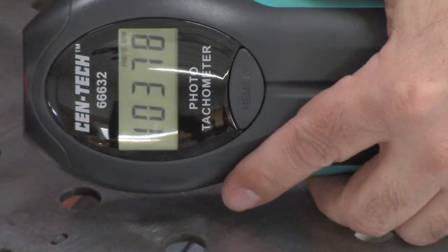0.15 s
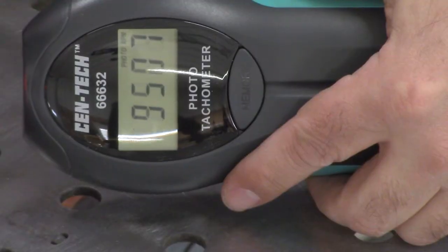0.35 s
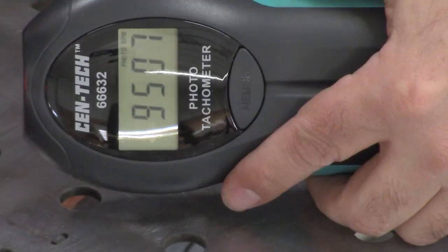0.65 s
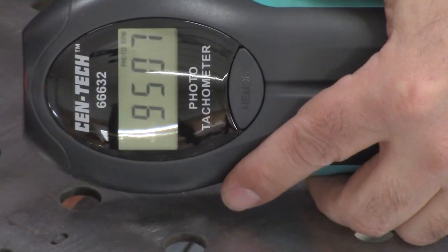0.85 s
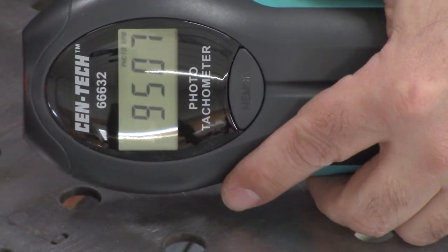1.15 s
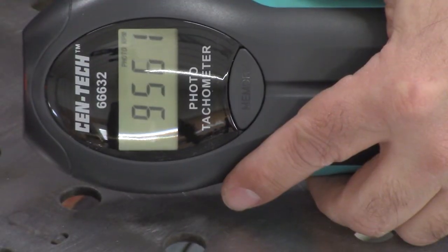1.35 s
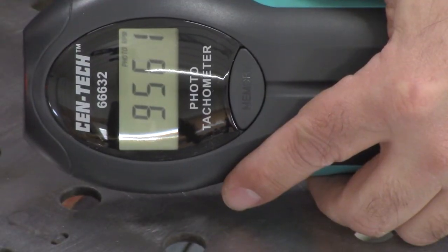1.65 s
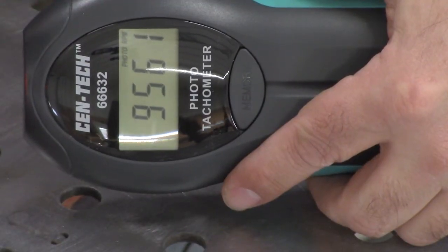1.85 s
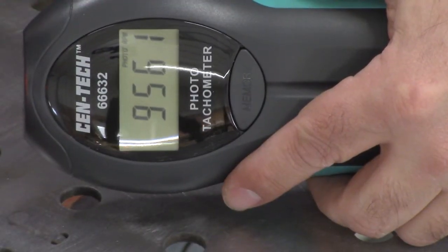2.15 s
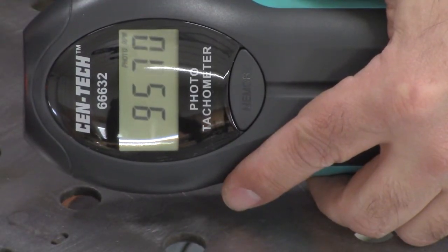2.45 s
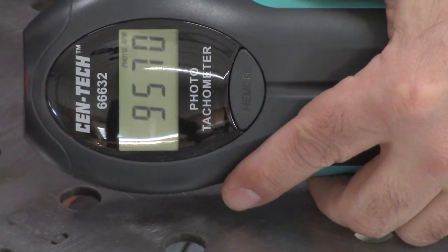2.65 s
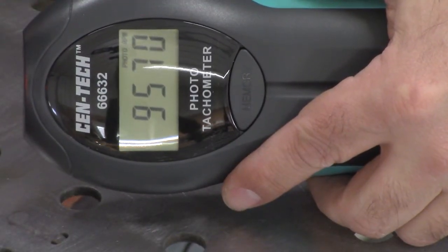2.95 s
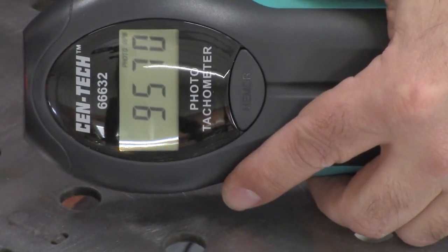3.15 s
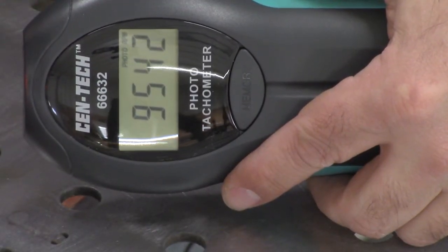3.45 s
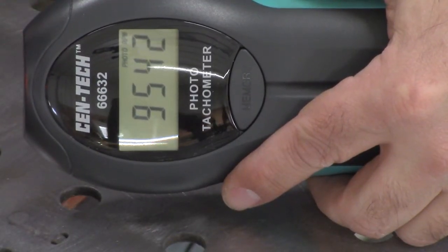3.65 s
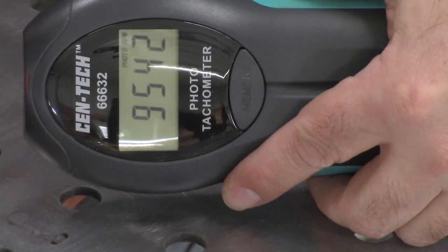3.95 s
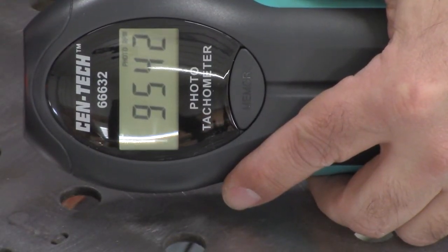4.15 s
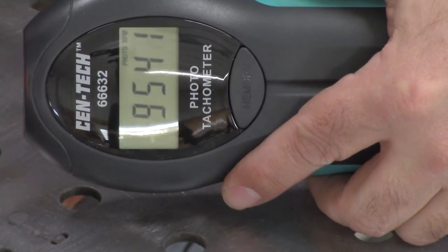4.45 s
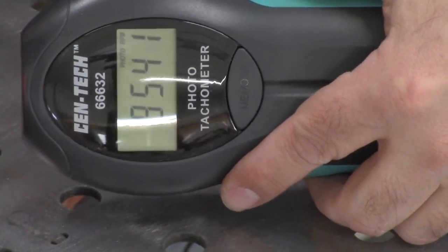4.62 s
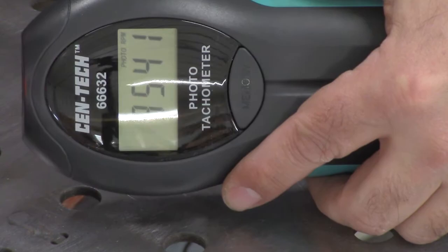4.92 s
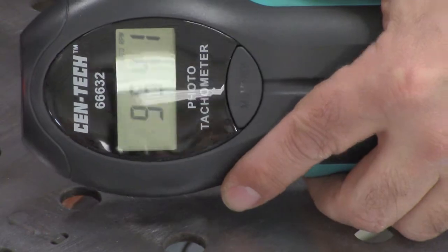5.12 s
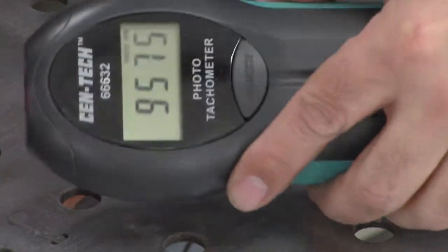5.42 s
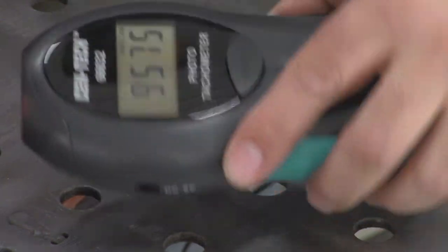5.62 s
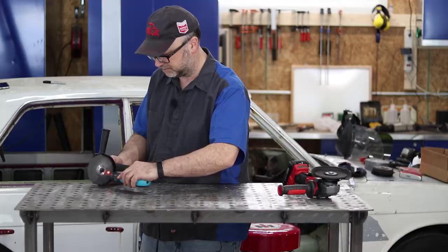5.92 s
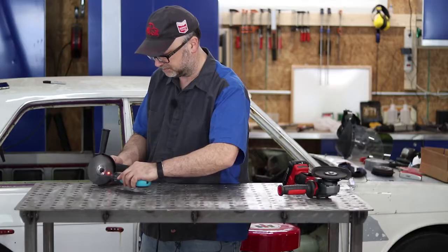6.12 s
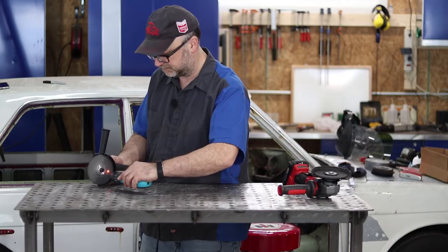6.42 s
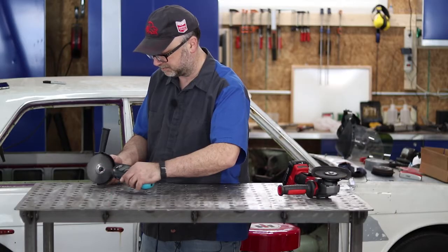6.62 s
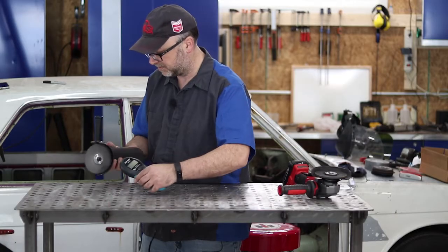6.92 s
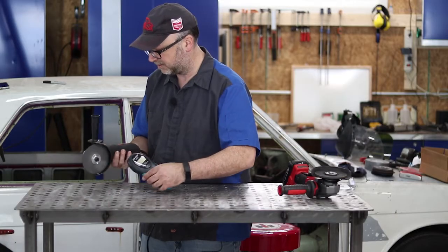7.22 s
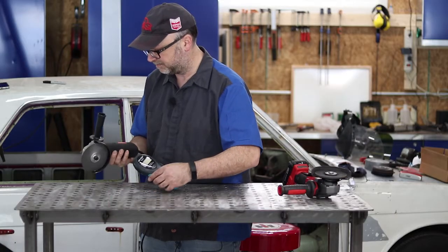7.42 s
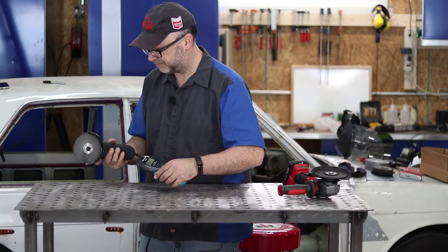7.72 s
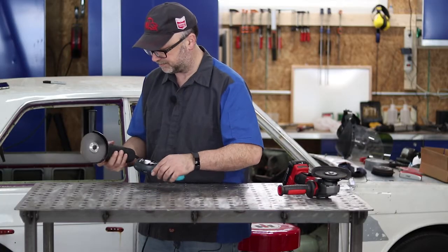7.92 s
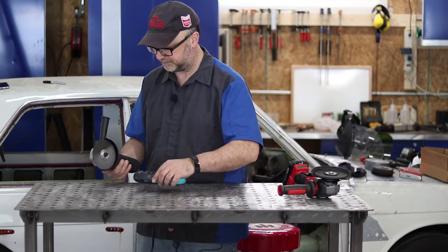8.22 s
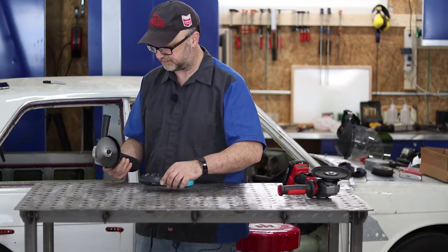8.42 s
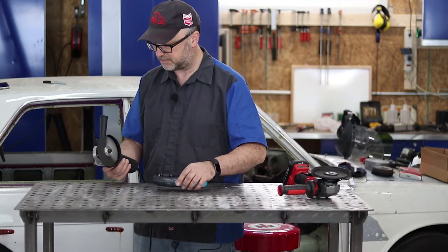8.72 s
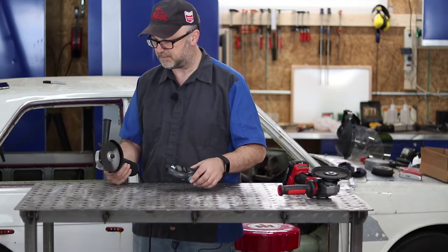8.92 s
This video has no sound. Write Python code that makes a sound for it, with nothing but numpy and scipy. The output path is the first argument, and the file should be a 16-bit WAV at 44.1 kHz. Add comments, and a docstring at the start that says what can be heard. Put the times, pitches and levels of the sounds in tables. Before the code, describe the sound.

Close, loud whirring of an unloaded angle grinder over a steel bench, switched off near the end and coasting down in a sliding whine and rattle.

```python
"""In a garage, a corded angle grinder runs free over a steel bench, is tilted and lifted, then coasts down.
Rotor unbalance hums, the fan's flow makes broadband noise, and the unloaded bevel gears rattle in their
backlash, exciting the resonances of gear head and guard. After switch-off the rattle slows, single clacks
stand out and a high whine slides down. One close microphone feeds the left channel; the right is silent."""
import sys
import numpy as np
from scipy import signal
from scipy.fft import rfft, irfft, next_fast_len
from scipy.io import wavfile
from scipy.ndimage import map_coordinates

SR = 44100
rng = np.random.default_rng(int(sys.argv[2]) if len(sys.argv) > 2 else 0)


def int16_out(signal):
    """Quantize to a 16-bit WAV file."""
    q = np.round(np.clip(np.atleast_2d(signal).T, -1, 1) * 32767)
    wavfile.write(sys.argv[1], SR, q.astype(np.int16))


N = 399987
T = np.arange(N) / SR  # time [s]

# All levels are relative: the gains of the mix follow.
# Rotor speed under power, drifting a little: (time [s], speed [turns/s])
SPEED = [(0.1, 491.2), (1.61, 492.2), (1.85, 491.2), (4.4, 491.2), (4.46, 493.3), (7.35, 494.4)]
# Tones while current flows; order 12 = armature slots, 13 = gear mesh: (multiple of rotor speed [1], level [dB])
DRIVEN = [(8.49, -60), (12, -60), (13, -60), (15.55, -66), (21.38, -66), (24.6, -66)]
# Shaking by the spindle: (multiple of spindle speed [1], level [dB])
SPINDLE = [(1, -63.5), (2, -66.5), (4, -58), (5, -62), (6, -60.5), (7, -62.5)]
# Rotor orders that make the disc sing as they pass its mode: (multiple of rotor speed [1], level [dB])
ROTOR = [(2, -56), (3, -54), (4, -57)]
# Radiation of the shaking by the tool's body: (frequency [Hz], level [dB])
BODY = [(90, -21), (160, -7), (200, -28), (270, -5.5), (360, 4), (460, -14), (640, -4), (800, -6),
        (1100, -1)]
# Response of the hand-held tool to unbalance and rocking: (frequency [Hz], level [dB])
SWAY = [(150, -18), (215, -12), (240, 0.5), (256, -6.5), (277, 1.5), (302, -17), (335, 1.5), (390, 2),
        (445, 5.5), (490, 0)]
# Resonances that the whine slides through: (frequency [Hz], half width [Hz], level [dB])
WHINE_PEAKS = [(8680, 270, 9), (10220, 240, 18), (12300, 440, 10), (14600, 600, 3)]
# Spectrum of the fan's rush: (frequency [Hz], level per hertz [dB])
RUSH = [(600, -30.5), (900, -15), (1100, -8), (1500, 2), (2100, 2), (2550, -2), (3200, 0.5), (4000, -1),
        (6300, -4.5), (7300, -10.5), (8800, -16), (11000, -7), (12800, -12), (15600, -10.5)]
# Spectrum of the gear rattle: (frequency [Hz], level per hertz [dB])
RATTLE = [(600, -12), (1200, -20), (2500, -4.5), (4000, 3.5), (5000, 2), (6100, 4.5), (7500, -6),
          (9300, -9.5), (12000, -4.5), (15600, -15)]
# Spectrum of the low draught: (frequency [Hz], level per hertz [dB])
DRAUGHT = [(60, -7.5), (150, -6), (300, -2.5), (430, 3), (550, 0), (720, 1), (860, -7.5), (1300, -20.5)]
# Spectral change of rush and rattle as the fan slows: (frequency [Hz], level [dB])
SLOW_FAN = [(1000, 4), (3500, -4), (6000, -6), (9000, -1), (11000, -35), (12200, -11), (15000, -19)]
# Air slots of the housing: (frequency [Hz], width [Hz], level [dB])
VENTS = [(1084, 90, 3.5), (1212, 150, 3.5), (2730, 110, -2), (5600, 360, -7)]
# Modes of gear head and guard: (frequency [Hz], width [Hz], level [dB])
GUARD = [(1956, 300, 13), (2160, 190, 3.5), (3550, 610, -1), (5200, 310, -19), (8300, 120, -10)]
# Rotor speed around which the guard is shaken hardest: (speed [turns/s], half width [turns/s], level [dB])
GUARD_SWELL = [(383, 100, 3)]
# Mode of the cutting disc: (frequency [Hz], width [Hz], level [dB])
DISC = [(990, 28, 0)]
# Strongest gear clacks while coasting: (time [s], peak level [dB])
CLACKS = [(8.0511, -31), (8.1104, -27.5), (8.16, -30), (8.212, -29.5), (8.259, -29), (8.313, -31),
          (8.3539, -37), (8.3958, -32), (8.4662, -33), (8.521, -31.5), (8.5766, -32), (8.63, -30),
          (8.6852, -33), (8.744, -34.5), (8.7877, -29.5), (8.8857, -33.5), (8.9316, -34.5), (8.99, -33)]
# Spectrum of a clack: (frequency [Hz], level per hertz [dB])
CLACK = [(600, -10), (1500, -6), (3600, 6), (5300, -3), (7500, -3.5), (12000, -24), (15600, -26)]
# Peaks and hollows that the shell gives to noise from inside: (frequency [Hz], half width [Hz], level [dB])
HOUSING = [(3910, 450, -3), (7200, 220, 2.5), (9000, 250, 1.5), (9400, 280, 2.5), (9560, 150, -3.5),
           (11130, 200, 0), (12050, 140, 3.5), (12850, 160, 2.5), (14500, 280, -6), (15300, 500, -8)]
# The tool lies flat, is tipped, tilted, turned further, then lifted; each move leads to a new pose:
# (move start [s], move length [s], rush [dB], draught [dB], vents [dB], guard [dB], disc [dB],
#  rattle over the rush [dB], bench echo delay [ms], echo strength [0-1])
POSES = [(0, .1, -39, -52.5, -44, -67, -65, -1.5, .92, 0),
         (4.06, 0.15, -38, -52, -43.5, -48.5, -65, -8, 0.75, 0.37),
         (4.2, 0.14, -37.5, -52.5, -49, -52, -65, -6, .68, 0.2),
         (4.45, 0.99, -37, -51.5, -63, -48.5, -66, -3.5, 0.69, 0.4),
         (6.627, 0.34, -38.5, -53, -69, -37, -54.5, -3, 0.7, 0.45)]
# Reflection from the bench: (frequency [Hz], level [dB])
BENCH = [(500, -11), (1100, -4), (5800, -1.5), (7300, 1.0), (10200, 2.0), (15000, -26)]
# Reverberation of the garage: (frequency [Hz], time to decay by 60 dB [s])
GARAGE = [(200, 0.22), (2000, 0.45), (12000, 0.12)]
# Spectrum of the room's low rumble: (frequency [Hz], level per hertz [dB])
FLOOR = [(12, -30), (20, 3), (43, -9), (118, -20), (184, -16), (300, -30), (390, -47), (660, -120)]

OFF_S = 7.475  # switch-off
TOP_HZ = 15780  # band limit
GEAR_RATIO = 13 / 40  # spindle turns per rotor turn
# friction takes this many turns/s each second; air drag equals it at DRAG_SPEED [turns/s]
FRICTION, DRAG_SPEED = 141.8, 400
# loss each time the speed halves [dB]
RUSH_FALL_DB, DRAUGHT_FALL_DB, RING_FALL_DB, RATTLE_FALL_DB, TONE_FALL_DB = 10.5, 8.5, 12, 2, 13.5
# further loss of rush and rattle above this edge, each time the speed halves
TREBLE_HZ, TREBLE_FALL_DB = 6000, 1
# the gears go quiet for a moment when the drive lets go: depths, and time constant of recovery
LULL_RATTLE_DB, LULL_RING_DB, LULL_S = 17, 6, 0.19
# unbalance at full speed; rocking twice a spindle turn, over the disc's level; coasting whine
HUM_DB, ROCKING_DB, WHINE_DB = -41.5, 2.5, -57
WHINE_ORDER, LOW_WHINE_ORDER = 36.8, 24.5  # multiples of rotor speed
# the gear falls back on the other flank after each clack
REBOUND_S, REBOUND_SCATTER_S, REBOUND_LOSS_DB = 0.032, 0.0028, 3.5


def amp(db):
    """The decibel scale: level to amplitude ratio."""
    return 10 ** (np.asarray(db) / 20)


def unit(x):
    """Normalization to unit rms."""
    return x / np.sqrt(np.mean(x ** 2) + 1e-20)


def along(points, hz):
    """Interpolation of (frequency, value) points on a logarithmic frequency axis."""
    f, v = np.transpose(points)
    return np.interp(np.log(hz + 1), np.log(f + 1), v)


def bumps(peaks, x):
    """Superposed bell-shaped (centre, half width, dB) peaks and hollows, in decibels."""
    return sum(db * np.exp(-((x - centre) / width) ** 2) for centre, width, db in peaks)


def wobble(rate):
    """Slow random modulation: a smooth curve through `rate` random knots a second."""
    return map_coordinates(rng.standard_normal(int(N * rate / SR) + 4), [T * rate])


def noise():
    """White noise: equal mean power at every frequency."""
    return rng.standard_normal(N)


def filtered(x, response):
    """Linear filtering: the spectrum of x times a frequency response."""
    size = next_fast_len(N + SR // 2)
    return irfft(rfft(x, size) * response(np.fft.rfftfreq(size, 1 / SR)), size)[:N]


def coloured(x, spectrum):
    """Spectral shaping that preserves the power of white noise."""
    return filtered(x, lambda hz: unit(amp(along(spectrum, hz))))


def rung(x, modes):
    """Modal resonance: parallel damped modes that preserve the power of white noise."""
    def response(f):
        h = sum(amp(db) * 1j * f * w / (c * c - f * f + 1j * f * w) for c, w, db in modes)
        h = h * f ** 4 / (f ** 4 + modes[0][0] ** 4)  # thin metal radiates little below its first mode
        return h / np.sqrt(np.mean(abs(h) ** 2))
    return filtered(x, response)


def bursts(times, sizes, rise, fade):
    """Impact envelopes: exponential rise and decay with time constants in seconds."""
    starts = np.bincount(np.clip(times * SR, 0, N - 1).astype(int), sizes, N)
    t = np.arange(SR // 25) / SR
    scuff = (1 - np.exp(-t / rise)) * np.exp(-t / fade)
    return signal.fftconvolve(starts, scuff / scuff.max())[:N]


def rotor_speed():
    """Rotational braking: after switch-off, constant friction and square-law air drag slow the rotor."""
    driven = np.interp(T, *np.transpose(SPEED))
    coast_s = np.maximum(T - OFF_S, 0)
    return DRAG_SPEED * np.tan(np.arctan(driven / DRAG_SPEED) - coast_s * FRICTION / DRAG_SPEED)


def halvings(speed):
    """Logarithmic speed scale: how many times the speed has halved since switch-off."""
    return np.log2(speed[int(OFF_S * SR)] / speed) * (T > OFF_S)


def pose():
    """Directional radiation: what the microphone gets from each part, gliding from pose to pose."""
    rows = np.array(POSES)
    values = rows[0, 2:, None]
    for before, after in zip(rows, rows[1:]):
        moved = np.clip((T - after[0]) / after[1], 0, 1)
        values = values + (after - before)[2:, None] * moved
    names = ["rush", "draught", "vents", "guard", "disc", "rattle", "delay", "echo"]
    return dict(zip(names, values))


def tone(turns, blur, rate):
    """Periodic excitation: a sine of unit rms locked to rotation, with phase jitter."""
    return np.sqrt(2) * np.sin(2 * np.pi * (turns + rng.random()) + blur * wobble(rate))


def unbalance(speed, rotor, held):
    """Rotating unbalance and disc rocking: forced vibration follows the held tool's response."""
    hum_db = HUM_DB + along(SWAY, speed) + 0.16 * wobble(12)
    hum = amp(hum_db) * tone(rotor, blur=0.03, rate=30)
    rocking_db = held["disc"] + ROCKING_DB + along(SWAY, 2 * GEAR_RATIO * speed)
    rocking = amp(rocking_db) * tone(2 * GEAR_RATIO * rotor, blur=0.16, rate=17)
    return hum + rocking


def coasting_whine(speed, rotor):
    """Order tracking: two lines locked to the rotor, their level set by the upper line's resonances."""
    high = tone(WHINE_ORDER * rotor, blur=0.8, rate=110)
    low = amp(-6) * tone(LOW_WHINE_ORDER * rotor, blur=1.2, rate=110)
    level_db = WHINE_DB + bumps(WHINE_PEAKS, WHINE_ORDER * speed) + 1.6 * wobble(30)
    return amp(level_db) * (high + low)


def shaft_shaking(speed, rotor):
    """Forced vibration: each spindle order swells as it slides through a body resonance."""
    shake = 0
    for order, db in SPINDLE:
        turns = order * GEAR_RATIO
        level_db = db + along(BODY, turns * speed) + 2.3 * wobble(8)
        shake = shake + amp(level_db) * tone(turns * rotor, blur=0.58, rate=15)
    return shake * speed / speed.max()


def singing_disc(speed, rotor):
    """Resonance: a rotor order sounds strongest as its frequency meets the disc's mode."""
    disc_hz, width_hz, _ = DISC[0]
    return sum(amp(db) / (1 + ((k * speed - disc_hz) / width_hz) ** 2) * tone(k * rotor, blur=0.43, rate=18)
               for k, db in ROTOR)


def driven_tones(rotor):
    """Slot and mesh excitation: orders of the loaded rotor, blurred more at high order."""
    return sum(amp(db + 2 * wobble(7.3)) * tone(k * rotor, blur=0.0038 * k * k, rate=30) for k, db in DRIVEN)


def tones(speed, rotor, power, held):
    """Superposition of the rotational tones; forces weaken with speed, some tones need the drive."""
    force = amp(-TONE_FALL_DB * halvings(speed))
    forced = force * (unbalance(speed, rotor, held) + (1 - power) * coasting_whine(speed, rotor))
    return forced + shaft_shaking(speed, rotor) + singing_disc(speed, rotor) + power * driven_tones(rotor)


def backlash(spindle, scatter, size_db):
    """Backlash impacts: the free gear bounces every few spindle turns, giving sharp snaps and dull knocks."""
    draws = rng.standard_normal((900, 4))
    gaps = np.clip(np.round(2.4 + 0.55 * draws[:, 0]), 1, None)
    turns = np.cumsum(gaps) + scatter * draws[:, 1]
    heard = turns < spindle[-1]
    times = np.interp(turns[heard], spindle, T)
    snap = bursts(times, amp(size_db * draws[heard, 2]), rise=0.00099, fade=0.0021)
    knock = bursts(times, amp(size_db * draws[heard, 3]), rise=0.0004, fade=0.0041)
    return unit(snap), unit(knock)


def slowing_colour(rush, speed):
    """Speed-dependent spectrum: the noise changes colour and loses treble as the fan slows."""
    slowed = np.clip(6.1 * (1 - speed / speed.max()), 0, 1)
    slow = amp(-1) * filtered(rush, lambda hz: amp(along(SLOW_FAN, hz)))
    rush = (1 - slowed) * rush + slowed * slow
    treble = filtered(rush, lambda hz: hz ** 4 / (hz ** 4 + TREBLE_HZ ** 4))
    return rush + (amp(-TREBLE_FALL_DB * halvings(speed)) - 1) * treble


def fan_and_gears(speed, rotor, power, held):
    """Flow noise and impact excitation: air and rattle sound with vents, guard and disc, fading with speed."""
    slower = halvings(speed)
    lull = (1 - power) * np.exp(-np.maximum(T - OFF_S, 0) / LULL_S)
    rush_db = held["rush"] - RUSH_FALL_DB * slower
    rattle_db = held["rattle"] - RATTLE_FALL_DB * slower - LULL_RATTLE_DB * lull
    ring_db = -RING_FALL_DB * slower - LULL_RING_DB * lull
    # the brushes hiss harder at each peak of the current, 120 times a second
    air = 1 + 0.06 * power * np.cos(2 * np.pi * 120 * T) + 0.1 * wobble(200)
    snap, knock = amp(rattle_db) * np.array(backlash(GEAR_RATIO * rotor, scatter=0.14, size_db=1.34))
    balance = 1 / np.sqrt(1 + amp(rattle_db) ** 2)  # offsets the power that the rattle adds

    fan = amp(rush_db + 3.5) * coloured(air * noise(), RUSH)
    rattle = amp(rush_db + 1.0) * coloured(snap * noise(), RATTLE)
    rush = slowing_colour(fan + rattle, speed)
    guard_db = held["guard"] + ring_db + bumps(GUARD_SWELL, speed) + 2.0
    guard = amp(guard_db) * rung(np.hypot(air, knock) * noise(), GUARD)
    vents = amp(held["vents"] - RUSH_FALL_DB * slower) * rung(noise(), VENTS)
    # the disc rings 2 dB less without the drive
    disc = amp(held["disc"] + ring_db + 3 + 2 * power) * rung(noise(), DISC)
    draught = amp(held["draught"] - DRAUGHT_FALL_DB * slower + 4.0) * coloured(noise(), DRAUGHT)
    return balance * (rush + guard) + vents + disc + draught


def clacks():
    """Impact and rebound: single tooth knocks, each with a softer return, also ring the guard."""
    s, db = np.transpose(CLACKS)
    rebounds = s + REBOUND_S + REBOUND_SCATTER_S * rng.standard_normal(len(s))
    times = np.r_[s, rebounds]
    sizes = amp(np.r_[db, db - REBOUND_LOSS_DB])
    knocks = bursts(times, sizes, rise=0.0006, fade=0.0049) * noise()
    return amp(-12.5) * coloured(knocks, CLACK) + amp(-11.5) * rung(knocks, GUARD)


def housing(x):
    """Enclosure resonance: the shell colours all noise from inside."""
    return filtered(x, lambda hz: amp(bumps(HOUSING, hz)))


def bench(x, held):
    """Comb filtering: a close reflection cuts notches that shift with the tool; long waves bend past."""
    short_waves = filtered(x, lambda hz: amp(along(BENCH, hz)))
    late = (T - held["delay"] / 1000) * SR  # reading position [samples]
    echo = held["echo"] * map_coordinates(short_waves, [late])
    return (x - echo) / np.sqrt(1 + held["echo"] ** 2)


def garage(x):
    """Reverberation: a diffuse tail in which each frequency decays at its own rate."""
    hz, t, z = signal.stft(rng.standard_normal(SR // 2), SR, nperseg=256)
    decay = amp(-60 * t / along(GARAGE, hz)[:, None])
    tail = signal.istft(z * decay, SR, nperseg=256)[1]
    delayed = np.pad(x, (400, 0))  # samples
    return signal.fftconvolve(delayed, tail / np.linalg.norm(tail))[:N]


def room_rumble():
    """Background noise: a steady low-frequency random sound."""
    return amp(-67.0) * coloured(noise(), FLOOR)


def scene():
    """Superposition at one microphone: grinder, reflections and rumble on the left, silence on the right."""
    speed, held = rotor_speed(), pose()
    rotor = np.cumsum(speed) / SR  # turns made so far
    power = np.clip((OFF_S - T) / 0.03, 0, 1)  # 1 while driven, 0 after switch-off
    clatter = bench(housing(fan_and_gears(speed, rotor, power, held) + clacks()), held)
    room = amp(-21) * garage(clatter)
    microphone = clatter + room + tones(speed, rotor, power, held) + room_rumble()
    return np.array([2 * microphone, np.zeros(N)])


def record(dry):
    """Band limitation: nothing is kept above the top frequency."""
    return np.array([filtered(channel, lambda hz: hz < TOP_HZ) for channel in dry])


dry = scene()
out = record(dry)
int16_out(out)
```